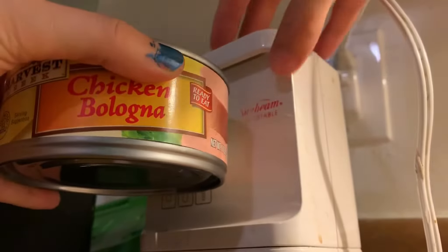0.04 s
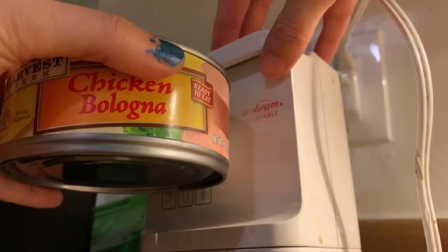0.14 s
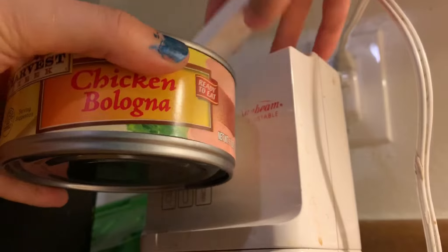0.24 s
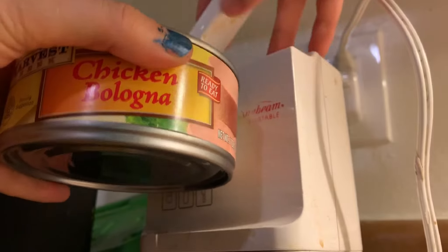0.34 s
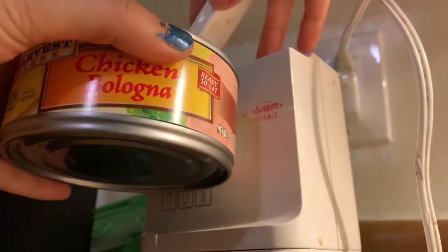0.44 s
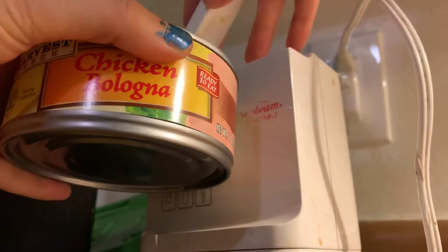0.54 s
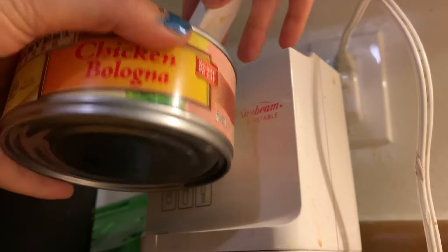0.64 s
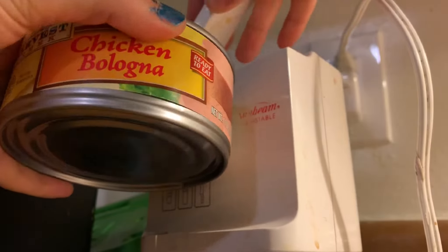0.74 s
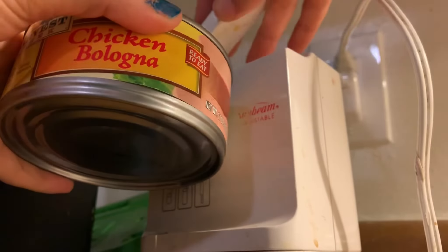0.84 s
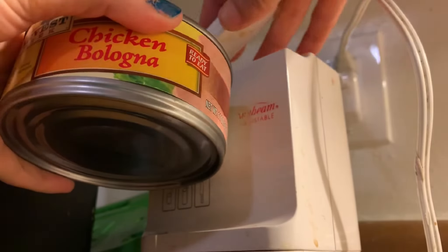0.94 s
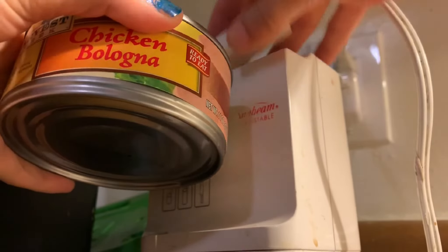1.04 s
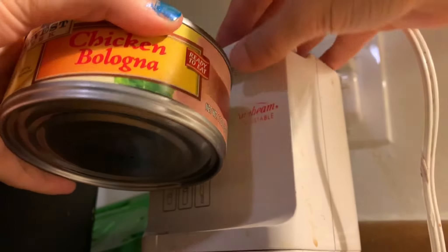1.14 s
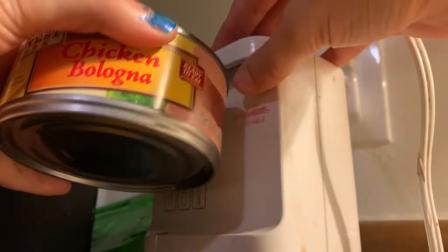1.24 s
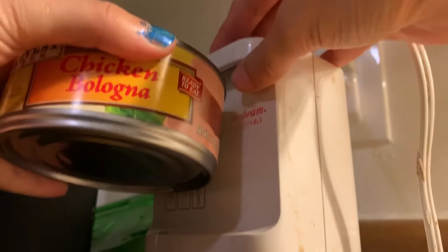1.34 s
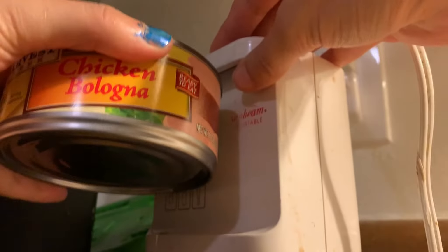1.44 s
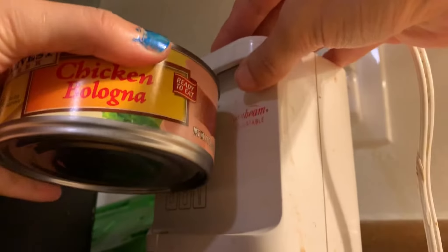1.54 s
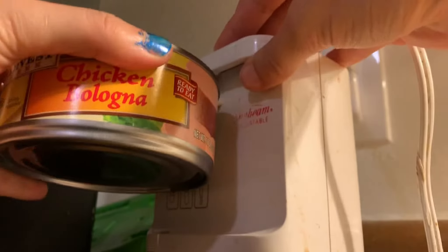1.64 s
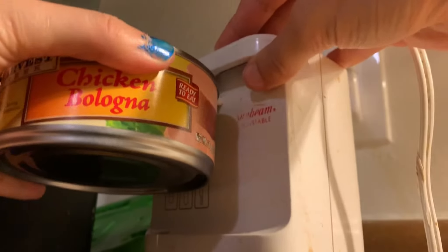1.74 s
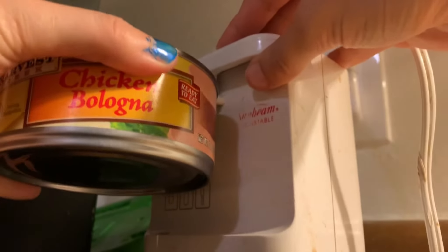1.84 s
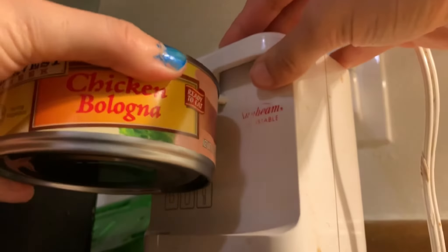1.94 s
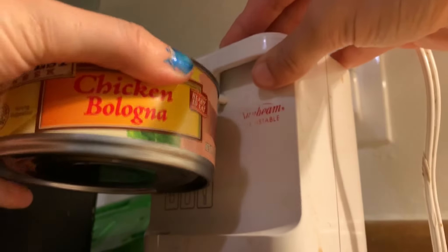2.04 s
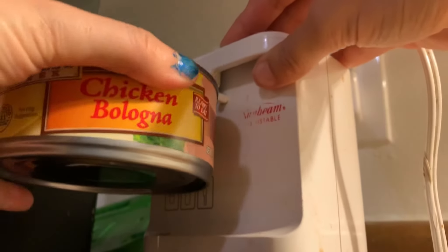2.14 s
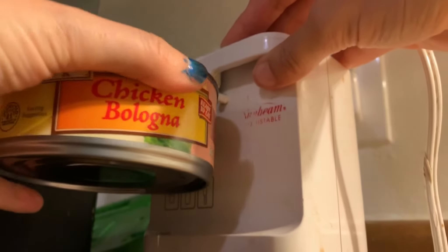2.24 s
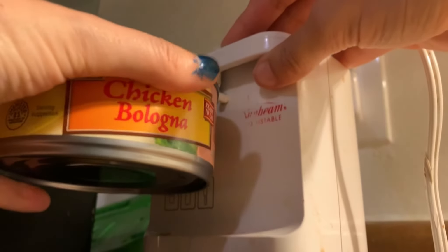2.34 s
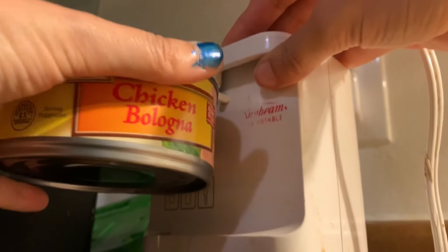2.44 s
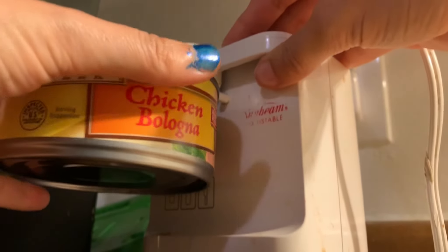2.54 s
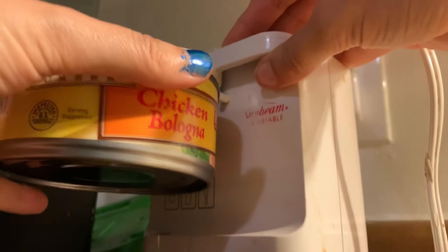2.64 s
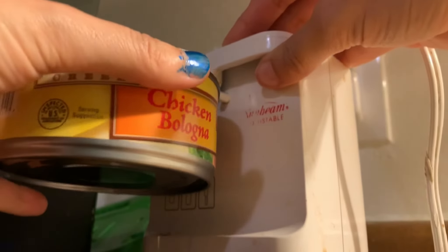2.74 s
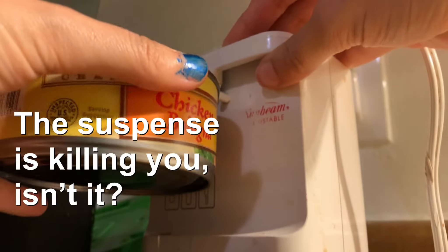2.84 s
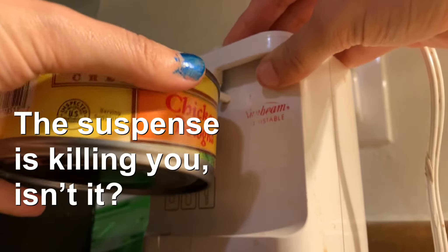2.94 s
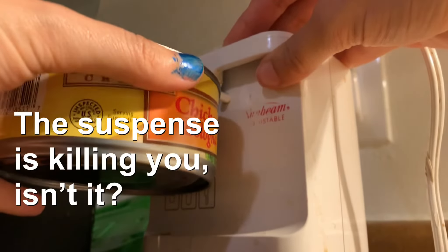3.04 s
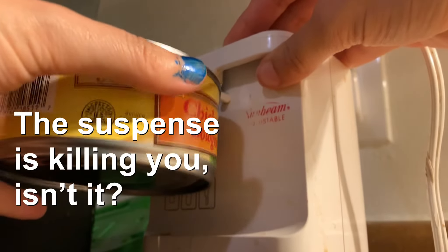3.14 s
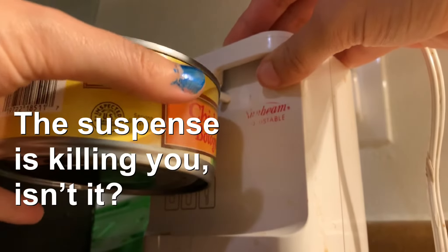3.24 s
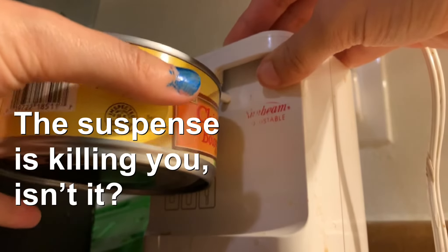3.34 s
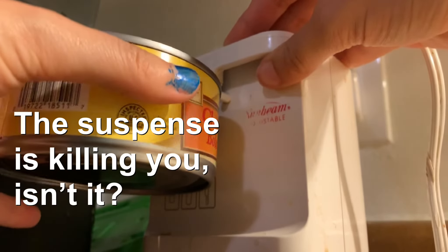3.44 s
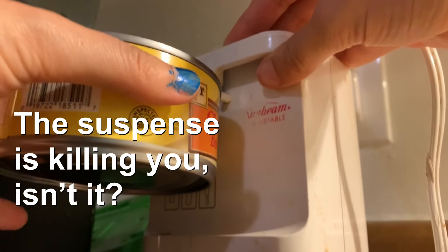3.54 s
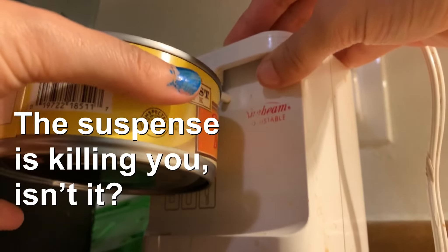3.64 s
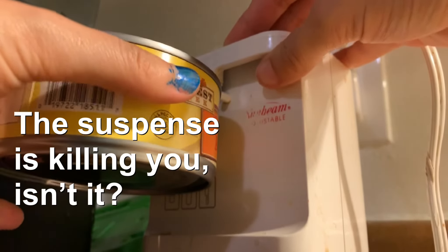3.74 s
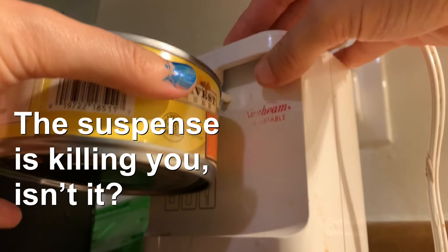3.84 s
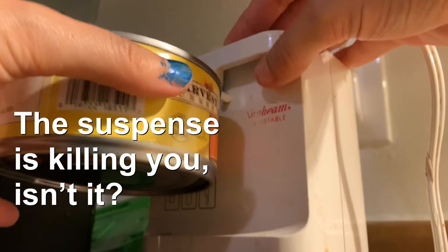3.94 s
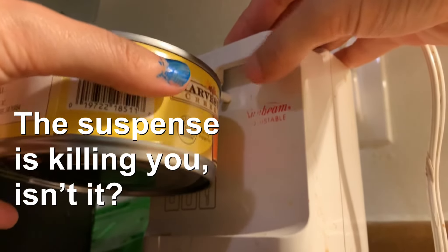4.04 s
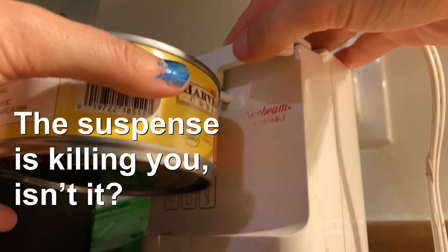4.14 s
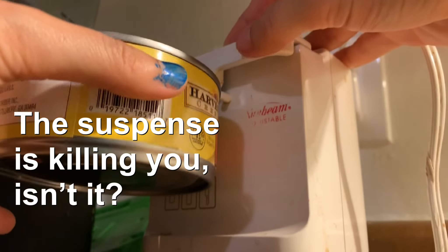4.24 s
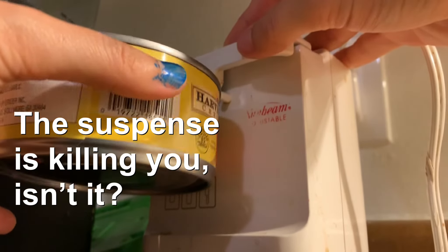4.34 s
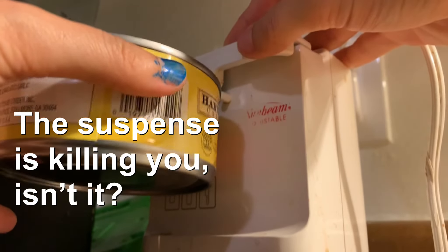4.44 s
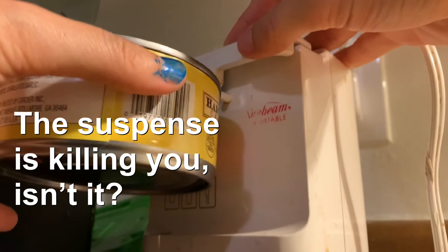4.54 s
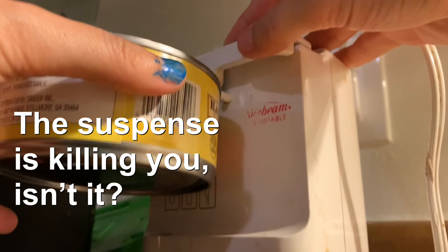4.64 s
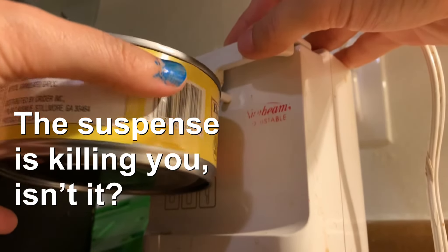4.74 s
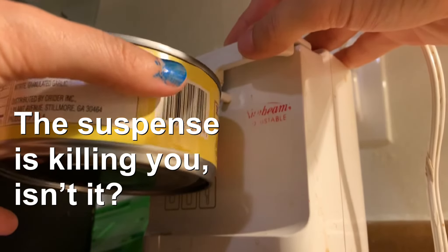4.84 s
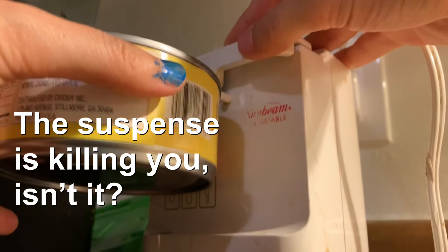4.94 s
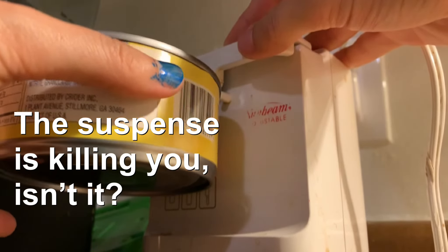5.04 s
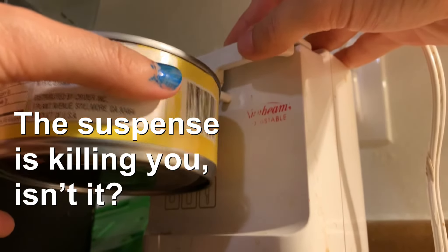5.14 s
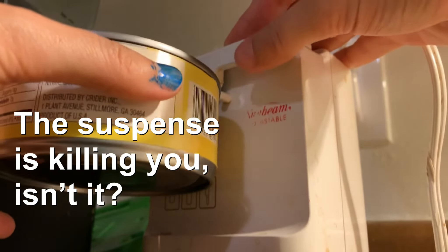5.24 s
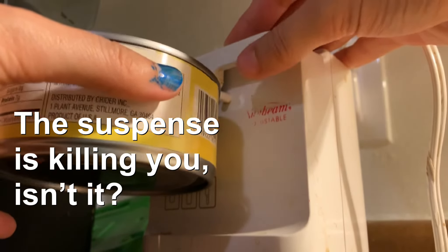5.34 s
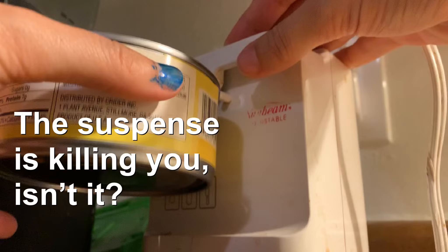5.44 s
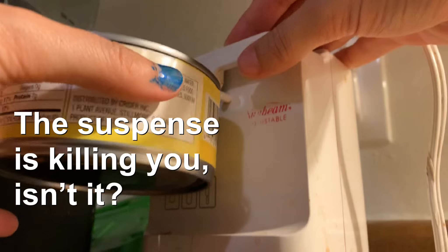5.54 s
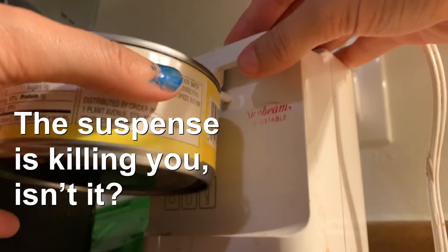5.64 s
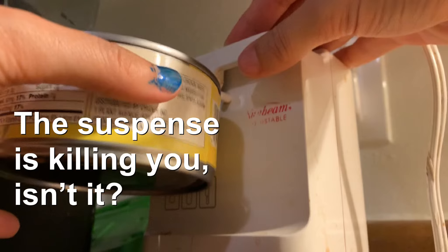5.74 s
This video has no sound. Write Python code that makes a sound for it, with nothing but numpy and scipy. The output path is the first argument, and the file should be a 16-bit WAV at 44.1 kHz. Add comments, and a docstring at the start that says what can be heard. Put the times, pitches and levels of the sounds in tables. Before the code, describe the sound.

After quiet bumps and plastic knocks, an electric can opener clacks on and runs with a loud, buzzing, rattling hum to the end.

```python
"""An electric can opener on a kitchen counter, close to a two-port phone microphone, in quiet room noise.
First hands push on the counter with a low rumble while lever and can knock on the plastic housing: short forces
ring counter, housing and tin. Then a mains motor starts: magnetic pull and shaft unbalance hum and beat,
the counter booms, and loose gears rattle and clack the housing and the tin: random ticks through their modes."""
import sys
import numpy as np
from scipy import signal
from scipy.fft import rfft, irfft, next_fast_len
from scipy.io import wavfile
from scipy.ndimage import uniform_filter1d

SR = 44100
rng = np.random.default_rng(int(sys.argv[2]) if len(sys.argv) > 2 else 0)


def wav_record(signal):
    """Record a signal, one row per channel, as 16-bit PCM in the file named by sys.argv[1]."""
    frames = np.transpose(np.atleast_2d(signal))
    bounded = np.clip(frames, -1, 1)
    # unit amplitude maps onto the largest positive 16-bit level
    quanta = np.round(bounded * 32767).astype(np.int16)
    wavfile.write(sys.argv[1], SR, quanta)


N = 254898
TIME = np.arange(N) / SR
SIZE = next_fast_len(N + SR // 2)
FREQ = np.arange(SIZE // 2 + 1) * SR / SIZE
START_S = 1.238  # the motor starts
WAVER_S = 0.017  # smoothing window of the random wavering

# Modes of the counter top. Each row: frequency in Hz, width in Hz, level in dB.
COUNTER_MODES = [(82.6, 73, -20), (117.5, 40.5, -10), (148.4, 28.3, -3), (167, 9.1, 0.5),
                 (183.6, 19.7, -0.5)]
# Modes of the plastic housing, low to high. Each row: frequency in Hz, width in Hz, level in dB.
HOUSING_MODES = [(235.6, 57, -5.5), (311, 44.6, -4.5), (375, 50, -0.5), (421.5, 50.5, 1.5), (460, 68, -2.5),
                 (535.6, 15.5, -5), (591, 216, -12.5), (766, 65, -7), (905, 59, -7.5), (1009, 57, -9),
                 (1095, 57, -11.5), (1230.7, 44.7, -2), (1302, 84, -7.5), (1446, 39, -6),
                 (1793, 277, -15.5), (1832, 360, -23.5)]
# Modes of the tin, low to high. Each row: frequency in Hz, width in Hz, level in dB.
TIN_MODES = [(2370, 290, -4), (2540, 155, 2), (2760, 300, -0.5), (3263, 280, 0.5), (3524, 56, 2.5),
             (3842, 540, -2), (4766, 1400, -3), (5780, 770, -1.5), (6610, 1800, -7), (8450, 2030, -8),
             (9390, 230, -4.5), (11950, 900, -14.5), (13050, 840, -12.5), (14470, 1800, -16),
             (15500, 710, -22)]
LOWER, UPPER = HOUSING_MODES[:5], HOUSING_MODES[5:]
WALL, LID = TIN_MODES[:6], TIN_MODES[6:]


def undb(db):
    """Gain of a level in dB."""
    return 10 ** (np.asarray(db) / 20)


def unit(x):
    """Scaled to rms 1."""
    return x / np.sqrt(np.mean(x ** 2))


def waver(length_s):
    """Smooth random wavering of spread 1: noise averaged twice over the window."""
    k = int(length_s * SR)
    once = uniform_filter1d(rng.standard_normal(N), k)
    return unit(uniform_filter1d(once, k))


def ring(force, modes, steep=1):
    """A force rings the modes of a body, with alternating signs; a higher steep narrows each resonance."""
    answer = 0
    for k, (hz, width, db) in enumerate(modes):
        damping = 1j * FREQ * width
        peak = (damping / (hz ** 2 - FREQ ** 2 + damping)) ** steep
        answer = answer + (-1) ** k * undb(db) * peak
    return irfft(rfft(force, SIZE) * answer, SIZE)[:N]


def bursts(times, db, lengths, rise_s):
    """Envelope of contacts: a quick rise and an exponential fade, lengths in seconds."""
    out = np.zeros(N)
    for s, gain, length in zip(times, undb(db), lengths):
        i = int(s * SR)
        t = TIME[:min(4410, N - i)]
        out[i:i + len(t)] += gain * np.exp(-t / length) * (1 - np.exp(-t / rise_s))
    return out


def grit(rate, spread_db):
    """Random ticks of unequal size and either sign, rate in ticks a second."""
    ticks = rng.random(N) < rate / SR
    size = undb(spread_db * rng.standard_normal(N))
    return ticks * size * rng.choice([-1, 1], N)


def contacts(envelope, modes, far_db, rate=8000., spread_db=3.5, steep=1):
    """Gritty contacts on the near face, plus those on the far face, in opposite phase at the two ports."""
    near, far = (ring(envelope * unit(grit(rate, spread_db)), modes, steep=steep) for _ in range(2))
    return near + undb(far_db) * far * np.array([[1], [-1]])


def kitchen():
    """Quiet room noise, alike at both ports in the bass and unrelated in the treble; its level wavers."""
    # Spectrum of the room noise. Each row: frequency in Hz, relative density in dB per Hz.
    noise_colour = [(53, -2), (90, 1.5), (172, -1), (244, -8.5), (467, -7.5), (606, -4.5), (737, -16),
                    (1190, -13), (1610, -19.5), (7170, -42), (10100, -68), (13700, -67), (16000, -61)]
    hz, db = np.transpose(noise_colour)
    colour = undb(np.interp(np.log(FREQ + 1), np.log(hz), db))
    mid, side = rfft(rng.standard_normal((2, SIZE))) * colour
    side = side * np.clip(FREQ / 940.0, .1, 1.1)
    noise = unit(irfft(np.array([mid + side, mid - side]), SIZE)[:, :N])
    sway = undb(1.7 * unit(uniform_filter1d(rng.standard_normal(N), size=2000)))
    return undb(-51) * sway * noise


def room(dry, t60_s, wet_db):
    """Short kitchen echo: a decaying noise response, dull in its tail and unrelated at the two ports."""
    t = TIME[:SR // 2]
    noise = rng.standard_normal((2, len(t)))
    dull = uniform_filter1d(noise, size=9, axis=1)
    # the bright part fades faster than the dull part
    tail = 3 * dull + (noise - dull) * np.exp(-t / 0.071)
    tail = tail * np.exp(-np.log(1000) * t / t60_s) * (t > .002)
    tail = tail / np.sqrt(np.sum(tail ** 2) / 2)
    return dry + undb(wet_db) * signal.fftconvolve(dry, tail, axes=1)[:, :N]


def ports(hz):
    """Complex gain of the left and the right port at a frequency: half the difference to each side."""
    # How the opener reaches the ports. Each row: frequency in Hz, left minus right in dB, left lead in radians.
    port_differences = [(55, 0, .4), (115, -4.5, .5), (185, -2.5, .7), (240, 5, .9), (300, 1, .2),
                        (365, 4, .1), (430, 0, -.1), (600, 1, .4), (900, 7, -.1), (1200, 1, -.1),
                        (1440, 1, .5), (2000, 4, -1.5), (2400, 1, .5), (3200, -1, -2.4), (3600, 2, -.5),
                        (5440, -2, -2.1), (6520, -2, -5.4), (8900, 0, -7.8), (13250, 0, -12.4),
                        (15300, 0, -14.3)]
    at, pan_db, lead = np.transpose(port_differences)
    halves = np.array([[.5], [-.5]])
    pan_db, lead = (np.interp(np.log(hz + 1), np.log(at), c) * halves for c in (pan_db, lead))
    return undb(pan_db) * np.exp(1j * lead)


def heard(x):
    """A sound of the opener as the two ports receive it."""
    return irfft(rfft(x, SIZE) * ports(FREQ), SIZE)[:, :N]


def push_rumble():
    """Hands push on the counter: one broad low mode, rising and falling steadily in dB around each push."""
    # Each row: moment of the push in seconds, rumble level there in dB.
    hand_pushes = [(0.078, -57), (0.17, -57), (0.28, -38), (0.574, -64), (0.728, -33.5), (1.006, -45),
                   (1.154, -35), (1.228, -39.5)]
    rise_db_s, fall_db_s, rest_db = 450, 224, -60
    level = undb(rest_db)
    for s, db in hand_pushes:
        level = level + undb(db - np.maximum(rise_db_s * (s - TIME), fall_db_s * (TIME - s)))
    return level * unit(ring(rng.standard_normal(N), [(56.0, 58.0, 0)]))


def knocks():
    """Each knock of lever or can thumps the counter, rings and scrapes the housing and ticks on the tin."""
    # Each row: start in seconds, relative levels in dB of upper housing, lower housing, counter thump and
    # bright tick, scrape length in seconds.
    lever_knocks = [(0.019, -49, -48, -48, -71, 0.003), (0.242, -37, -33, -29, -49, 0.0025),
                    (0.251, -39, -36, -39, -43, 0.0036), (0.28, -45, -49, -48, -51, 0.0019),
                    (0.33, -27, -27.5, -42, -41, 0.0016), (0.354, -40, -34, -30.5, -47, 0.0031),
                    (0.392, -44, -49, -38, -69, 0.003), (0.54, -55, -45, -39.5, -74, 0.003),
                    (0.65, -44, -49, -54, -56, 0.003), (0.705, -32, -31.5, -40, -46, 0.0025),
                    (0.718, -20, -27, -20, -36, 0.0051), (0.734, -23.5, -29, -47, -32.5, 0.0049),
                    (0.849, -61, -46, -41, -72, 0.0025), (0.997, -39, -49, -46, -44, 0.003),
                    (1.12, -21, -56, -54, -29.5, 0.0059), (1.13, -26, -44, -51, -24, 0.0027),
                    (1.139, -33, -35, -39, -37, 0.0058), (1.16, -35, -42, -30, -43, 0.0034),
                    (1.177, -36, -51, -50, -28, 0.0047), (1.193, -29.5, -48, -52, -28, 0.0063)]
    at, upper_db, lower_db, thump_db, tick_db, length = np.transpose(lever_knocks)
    # the gripping hands damp housing and tin, which widens their modes
    housing, tin = (np.array(modes) * [1, 2.5, 1] for modes in (HOUSING_MODES, TIN_MODES))
    thump = ring(bursts(at, thump_db, np.full(len(at), .001), 0.0013), COUNTER_MODES[2:4])
    lower = ring(bursts(at, lower_db, np.full(len(at), .0006), .0001), housing[1:7])
    upper = ring(bursts(at, upper_db, np.full(len(at), .0005), .0001), housing[5:])
    scrape = contacts(bursts(at, upper_db, length, 0.00079), housing[5:], -7.0)
    tick = contacts(bursts(at, tick_db, length, 0.0004), tin[3:], -3.7, steep=4.0)
    tap = undb(22) * lower + undb(18) * upper + undb(23.0) * scrape + undb(4.0) * tick
    return undb(32) * thump + push_rumble(), tap


def hum(pull, shaft, on, speed):
    """Lines at multiples and sums of magnetic pull and shaft turn; those of the shaft grow with its unbalance."""
    # Each row: multiple of the pull, multiple of the shaft, level in dB.
    hum_lines = [(0, 1, -29), (1, 0, -21), (1, 1, -22.5), (0, 2, -36), (0, 3, -41), (2, -2, -38),
                 (2, -1, -32), (2, 0, -41), (2, 1, -42), (3, 0, -37), (3, 1, -37), (2, 3, -39),
                 (4, -1, -40)]
    lag_rad = 2.55  # the hum trails the forces
    lines = []
    for m, k, db in hum_lines:
        line = undb(db) * np.sqrt(2) * np.cos(m * pull + k * shaft - lag_rad)
        lines.append(line * (speed if k else on))
    return lines


def counter_boom(on):
    """Gritty contacts ring the counter modes into a fairly steady boom."""
    boom = unit(contacts(on, COUNTER_MODES, -30, steep=1.94))
    return unit(boom / uniform_filter1d(boom[0] ** 2 + .05, size=1800) ** .3)


def clacks(phases, beat, load):
    """The loud clacks, and a small one at each lift of the gears, stronger at the top of the beat."""
    # Loudest clacks: the first is the switch hit as the motor starts, the rest are gear clacks. Each row: start
    # in seconds, relative peak in dB, upper housing share in dB.
    loud_clacks = [(1.237, -25, 14), (1.301, -15.5, -13), (1.328, -16.5, -2), (1.357, -19, 13),
                   (1.416, -35, -3), (1.4374, -17, 10), (1.4747, -16, 7.5), (1.495, -15.5, 7.5),
                   (1.5095, -16.5, -8), (1.6537, -21, 8), (1.682, -17.5, -5), (1.73, -16.5, 6.5),
                   (1.84, -34, 19), (1.89, -26.5, -6), (2.0047, -17, 12.5), (2.041, -20, -8),
                   (2.098, -18, -5), (2.2087, -15, 6), (2.2982, -18.5, 13.5), (2.4113, -17.5, 10),
                   (2.428, -21, 18), (2.512, -24, -1), (2.529, -14, 2), (2.55, -15.5, 10.5),
                   (2.62, -17, 11), (2.712, -20, 10), (2.732, -12, 4), (2.84, -23, 8), (2.872, -19.5, 15),
                   (2.915, -14.5, -6), (2.9326, -23, 9), (3.0073, -13.5, 11), (3.0222, -12, 2),
                   (3.043, -15, -2), (3.137, -15.5, -12), (3.149, -14.5, 9.5), (3.2229, -16, 7),
                   (3.254, -18, -3), (3.366, -17, 11), (3.3872, -18, 12), (3.423, -22, 2),
                   (3.5144, -11.5, -15), (3.5464, -19, 8), (3.643, -15.5, 10), (3.659, -18, -7),
                   (3.73, -14, 8), (3.7502, -17, 7), (3.7839, -17, 8), (3.876, -16, 3), (3.949, -11.5, -4),
                   (4.057, -18, 5), (4.077, -15, -5), (4.132, -14, 10), (4.1668, -28, 8),
                   (4.1847, -15.5, 12.5), (4.241, -12, 5), (4.279, -26, -10), (4.3465, -18.5, -2),
                   (4.3623, -14, 2), (4.3836, -18, -6), (4.459, -14.5, 1), (4.4877, -16.5, -12),
                   (4.5497, -11, 4), (4.565, -21, 2), (4.6566, -17.5, 11.5), (4.691, -19, 11),
                   (4.749, -17.5, 12.5), (4.8611, -13, 10.5), (4.967, -24, -2), (5.058, -18.5, -4),
                   (5.0773, -18, 9), (5.148, -16, 9), (5.236, -15, 0), (5.2803, -12.5, -13),
                   (5.3328, -12, 8.5), (5.4412, -16.5, 11), (5.4603, -12.5, 11), (5.477, -17, -12),
                   (5.547, -14, 6), (5.581, -35, 6), (5.63, -17.5, 15), (5.733, -16.5, 15),
                   (5.749, -19, 10)]
    mean_db, beat_db, scatter_db = -33, 4, 4.5  # small clacks: mean peak, swing with the beat, scatter
    turns = np.concatenate([np.flatnonzero(np.diff(np.floor(p / (2 * np.pi)))) for p in phases])
    turns = turns[turns > START_S * SR]
    chance = rng.standard_normal((len(turns), 3)).T
    at = turns / SR - .003 + 0.0014 * chance[1]
    peak_db = mean_db + load[turns] + beat_db * beat[turns] + scatter_db * chance[0]
    share_db = 3 + 4 * chance[2]
    return np.concatenate([np.transpose(loud_clacks), np.array([at, peak_db, share_db])], axis=1)


def pings(times, db, t60_s):
    """Each clack leaves one short note near a mode of the tin, with its own phase between the ports."""
    out, t = np.zeros((2, N + 2205)), TIME[:2205]
    notes = np.array(TIN_MODES)[[0, 1, 1, 2, 2, 4, 5, 8], 0]  # repeats are picked more often
    chance = rng.uniform(-1, 1, (len(times), 4))
    for s, gain, (pick, detune, size, lead) in zip(times, undb(db), chance):
        f = notes[int(abs(pick) * len(notes))] * (1 + 0.032 * detune)
        fade = np.exp(-np.log(1000) * t / t60_s) * (1 - np.exp(-t / 0.0014))
        phase = np.pi * lead * np.array([[.5], [-.5]])
        i = int(s * SR)
        out[:, i:i + len(t)] += gain * undb(0.5 * size) * fade * np.sin(2 * np.pi * f * t + phase)
    return out[:, :N]


def rattle(part, load, beat, level_db, load_slope, beat_db, waver_db):
    """Steady rattle of a part: its level follows the cutting load in dB per dB, the beat and its own wavering."""
    swing_db = load_slope * load + beat_db * beat + waver_db * waver(WAVER_S)
    return undb(level_db + swing_db) * unit(part)


def motor():
    """Magnetic pull and shaft unbalance drive the hum; the counter booms; loose gears rattle housing and tin."""
    # Shaft speed. Each row: moment in seconds, turns a second.
    shaft_speed = [(1.24, 25), (1.3, 44), (1.36, 54), (1.7, 54.6), (2.0, 54.5), (2.3, 55.0), (2.7, 55.2),
                   (3.3, 55.1), (3.7, 55.3), (4.0, 55.0), (4.3, 55.1), (4.7, 54.9), (5.78, 54.9)]
    # Running motor. Each row: moment in seconds, cutting load in dB of rattle before each part's slope,
    # counter boom swing in dB.
    motor_run = [(1.24, 2, 1), (1.27, -6, -1.5), (1.31, 1, -12), (1.36, 3, 2.5), (1.5, -4.5, 0),
                 (1.58, -3.5, -7), (1.76, -3.5, -2), (1.97, -4, -1.5), (2.3, -1, -0.5), (2.75, 0.5, -0.5),
                 (3.2, 1, 0), (3.9, 1.5, 1), (4.2, 1, 3), (4.45, 0, -1), (5.0, 0.5, 0), (5.25, -1.5, -2.5),
                 (5.5, 2, -1.5), (5.78, 1, 2.5)]
    s, load, boom_db = np.transpose(motor_run)
    load = np.interp(TIME, s, load)
    on = np.clip((TIME - START_S) / 0.0021, 0, 1)
    # unbalance grows with the square of speed
    speed = np.clip((TIME - START_S) / 0.21, 0, 1) ** 2

    pull_hz, aligned_s = 120.0, 3.046  # aligned: pull and unbalance push the same way
    shaft = 2 * np.pi * np.cumsum(np.interp(TIME, *np.transpose(shaft_speed))) / SR
    shaft = shaft - shaft[int(aligned_s * SR)]
    pull = 2 * np.pi * pull_hz * (TIME - aligned_s)
    # the gears lift off once a turn and at the difference of pull and turn; the two beat about ten times a second
    lift = 0.08 * np.cos(shaft) + 0.22 * np.cos(pull - shaft) + 0.057 * np.cos(2 * pull + shaft)
    gate = on * np.exp(lift)
    beat = speed * np.cos(pull - 2 * shaft)

    lines = hum(pull, shaft, on, speed)
    # hum and boom dip deeply by chance but hardly swell
    sway = undb(np.interp(TIME, s, boom_db) - beat + 2.5 * np.minimum(waver(WAVER_S), .4))
    low = lines[0] + sway ** 0.56 * sum(lines[1:]) + undb(-19.0) * sway * on * counter_boom(on)
    lower = contacts(gate, LOWER, -18.0, rate=2500., spread_db=1.0)
    low = low + rattle(lower, load, beat, level_db=-24, load_slope=0.38, beat_db=0, waver_db=1.5)

    upper = contacts(gate, UPPER, -9, rate=2500., spread_db=3.5)
    wall = contacts(gate, WALL, -4, rate=1400., spread_db=4.0, steep=2)
    lid = contacts(gate ** 1.3, LID, -10, rate=1900., spread_db=4.5, steep=2)
    high = rattle(upper, load, beat, level_db=-26, load_slope=1.12, beat_db=0.1, waver_db=2)
    high = high + rattle(wall, load, beat, level_db=-41.5, load_slope=0.7, beat_db=1.5, waver_db=2)
    high = high + rattle(lid, load, beat, level_db=-40, load_slope=0.5, beat_db=1.5, waver_db=1.5)

    at, peak_db, share_db = clacks([shaft, pull - shaft], beat, load)
    housing_hits = bursts(at, peak_db + share_db - 1.5, np.full(len(at), .004), 0.0025)
    tin_hits = bursts(at, peak_db + 9.5, np.full(len(at), .002), 0.0043)
    high = high + undb(21.0) * contacts(housing_hits, UPPER, -9)
    clack = contacts(tin_hits, TIN_MODES, -8.0, steep=2.8)
    # the added slope of the signal makes hard clacks brighter than the steady rattle
    clack = undb(1.5) * clack + undb(1) * np.diff(clack, prepend=0)
    return low, high + clack + pings(at, peak_db - 9.5, 0.041)


def scene():
    """Bass and low rattle travel through the counter; the rest also echoes in the kitchen."""
    low, high = motor()
    thump, tap = knocks()
    return heard(low + thump) + room(heard(high + tap), t60_s=0.22, wet_db=-15) + kitchen()


def record(dry):
    """The phone rounds the loudest peaks and cuts the top above 15750 Hz."""
    top = signal.ellip(14, .2, 60, 15750, fs=SR, output="sos")
    return signal.sosfilt(top, np.tanh(0.84 * dry) / 0.74)


dry = scene()
out = record(dry)
wav_record(out)
```